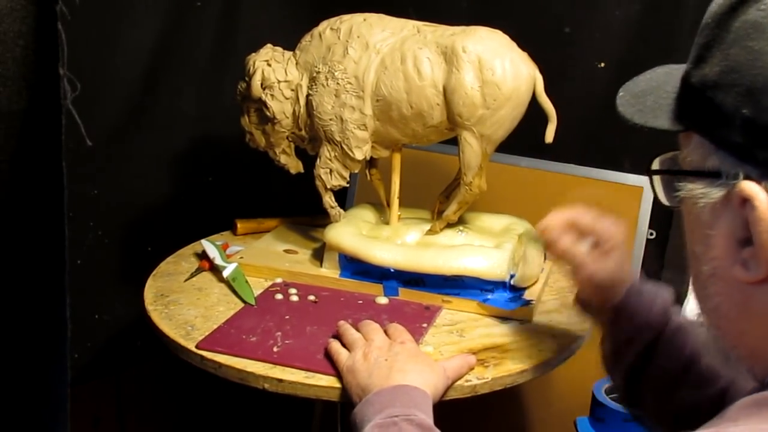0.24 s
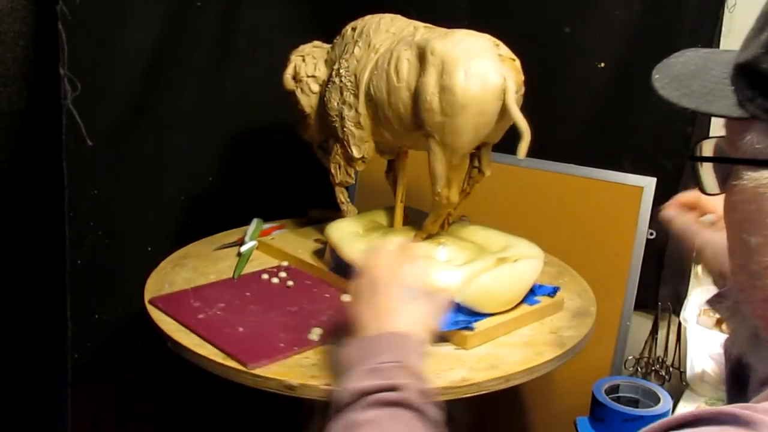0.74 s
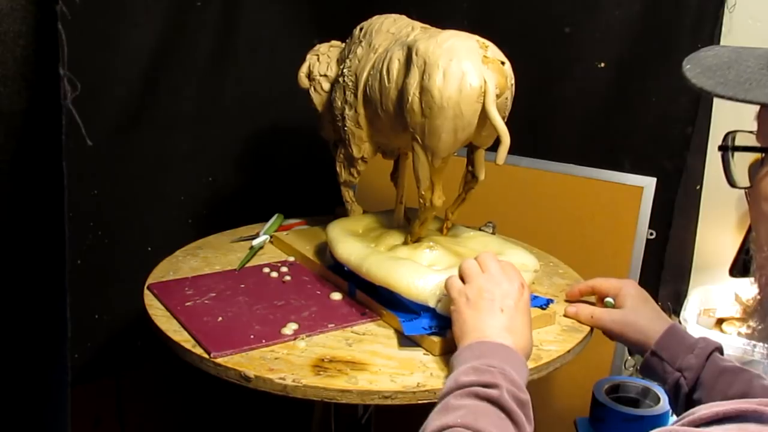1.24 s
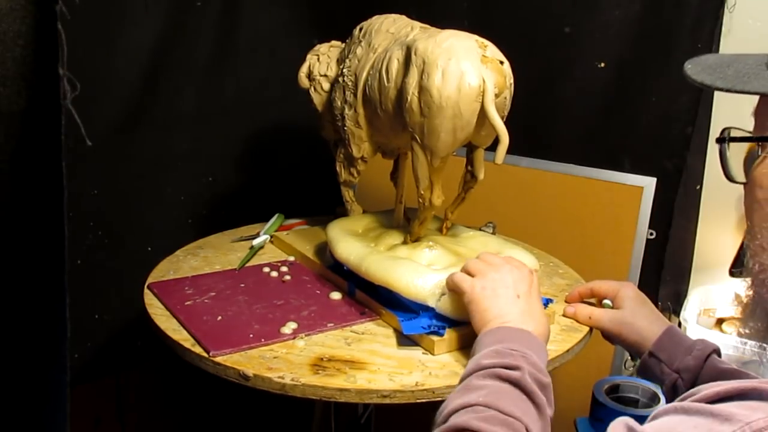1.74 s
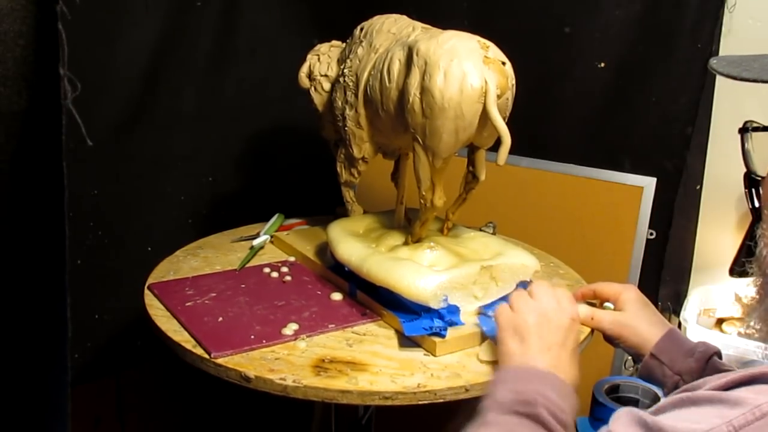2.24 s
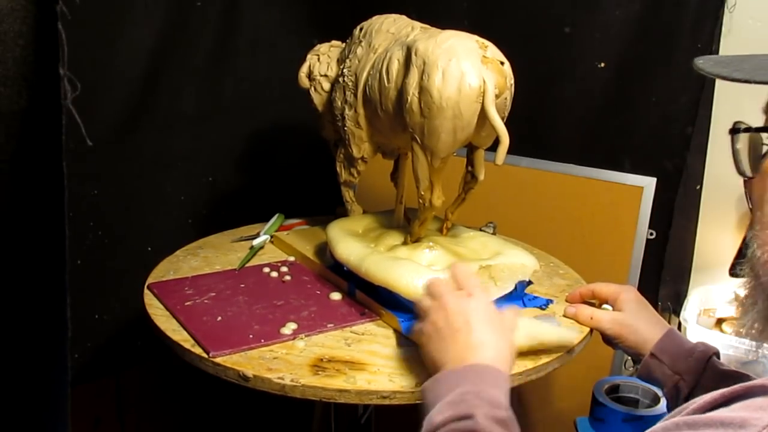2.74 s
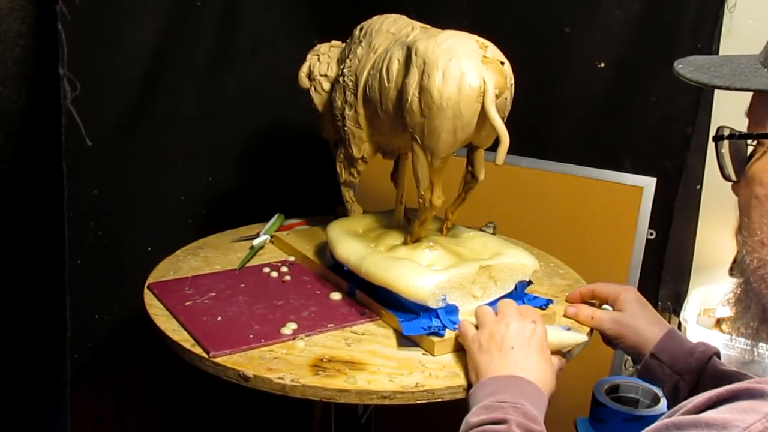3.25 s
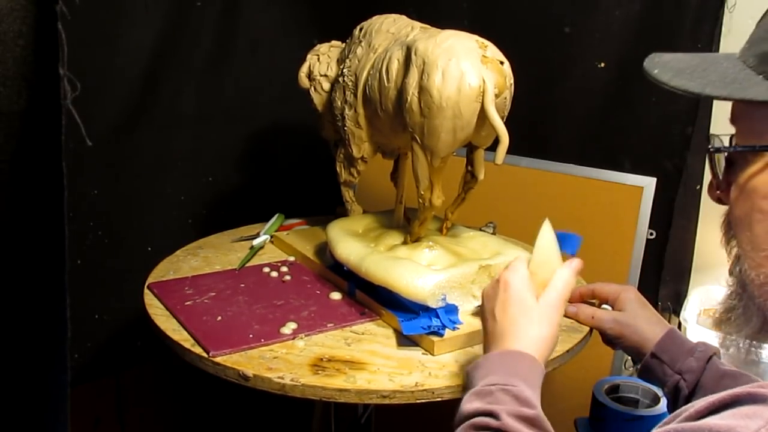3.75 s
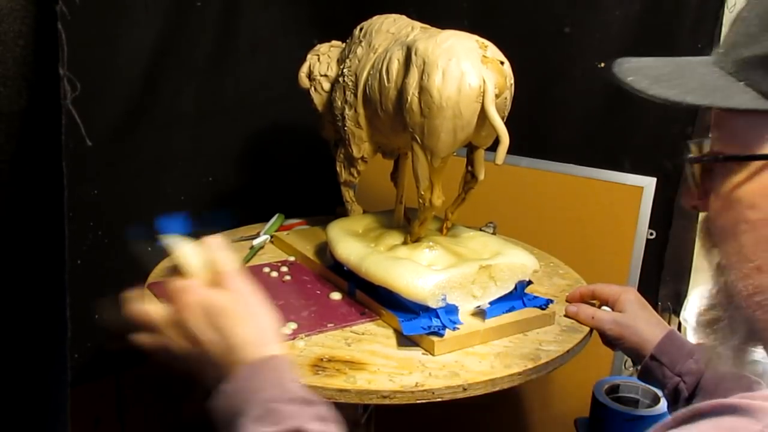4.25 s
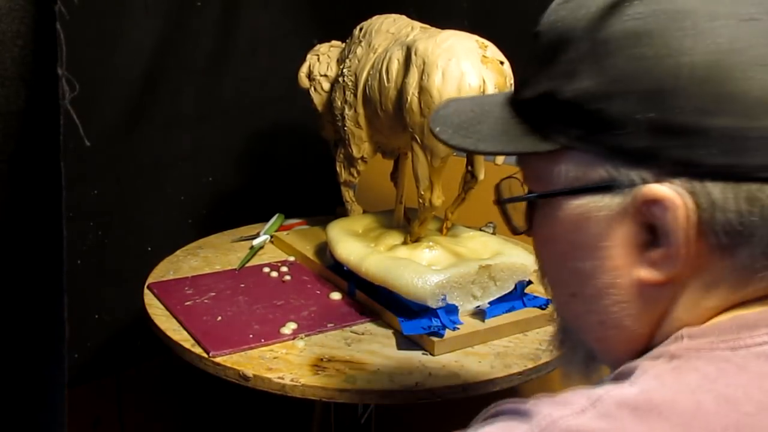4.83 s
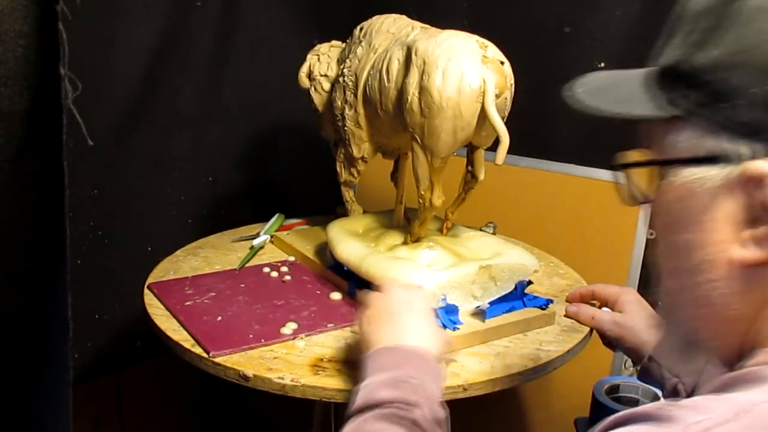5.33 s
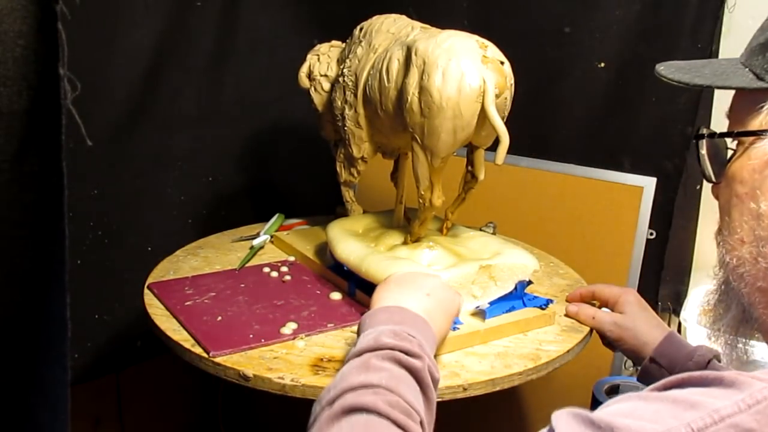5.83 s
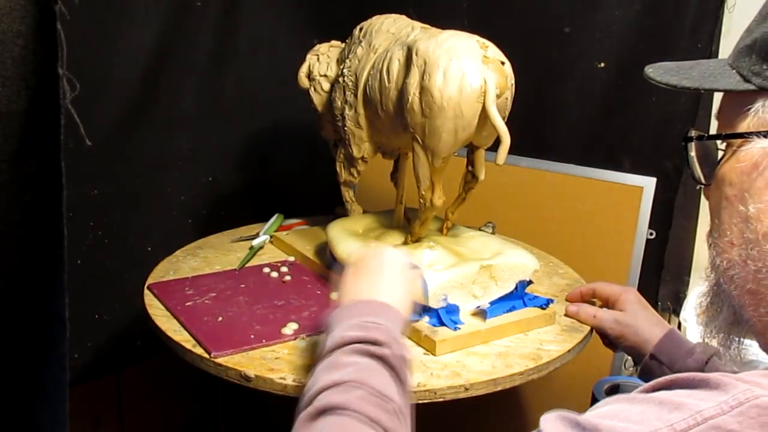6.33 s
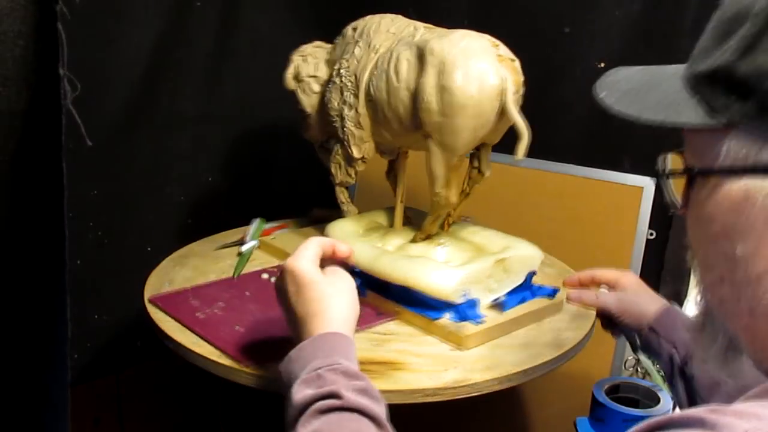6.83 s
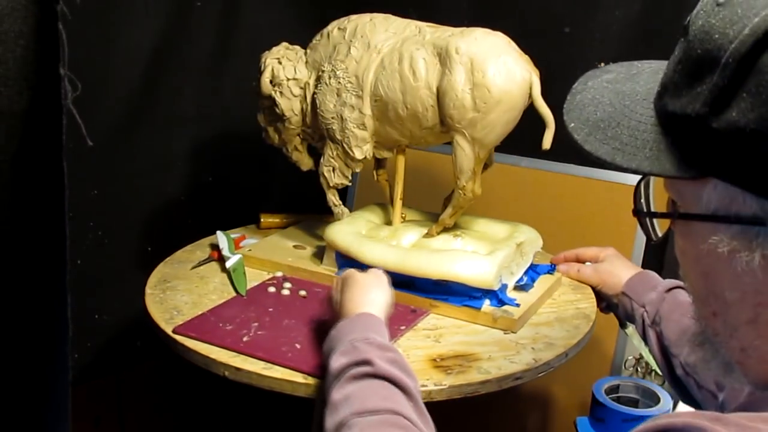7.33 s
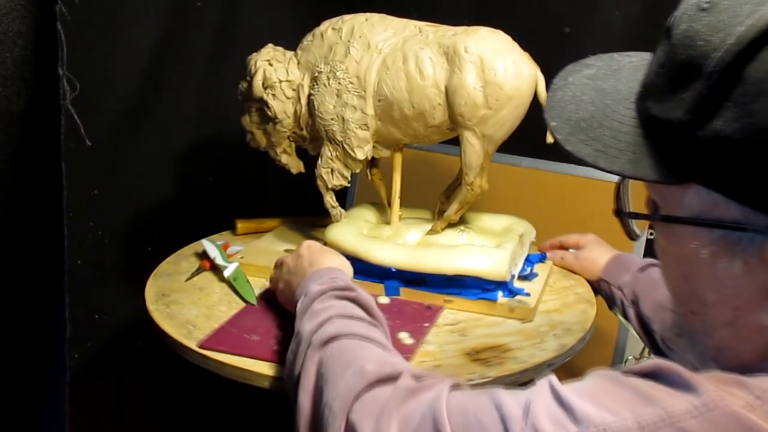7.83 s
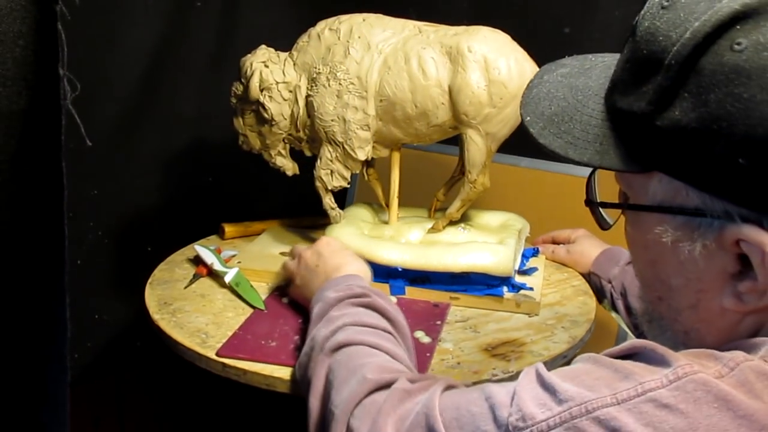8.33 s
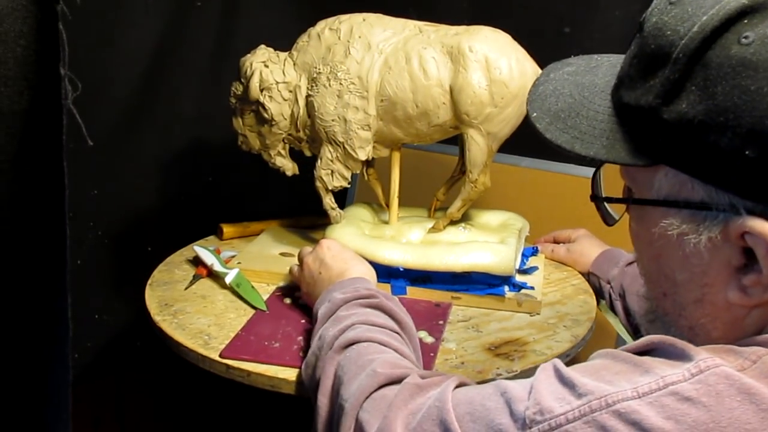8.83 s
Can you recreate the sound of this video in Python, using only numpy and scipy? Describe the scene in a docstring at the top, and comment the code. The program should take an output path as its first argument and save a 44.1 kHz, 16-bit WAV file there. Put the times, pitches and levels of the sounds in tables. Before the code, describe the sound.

Hands pry and tear hard foam and tape off a wooden base in a small quiet studio, with scratchy crackles, sharp snaps and knocks.

```python
"""Hands pry, tear and snap hard foam and tape off a wooden base on a turntable, in a small quiet studio.
A scratchy run of bursting cells (filtered random pulses) opens; snaps (decaying noise) and faint squeaks follow.
Near 2.2 s comes the loudest tear, with knocks (noise-driven resonances), then a ringing break at 3.6 s;
near 5 s a hollow note (a swelling sine) sounds, near 6.3 s a volley of loud snaps, then smaller breaks to the end.
Blurred near echoes and a noise tail answer; filtered noise hisses throughout; the loudest breaks overload."""
import sys
import numpy as np
from scipy import signal
from scipy.fft import rfft, irfft, next_fast_len
from scipy.io import wavfile
from scipy.ndimage import map_coordinates

SR = 44100
rng = np.random.default_rng(int(sys.argv[2]) if len(sys.argv) > 2 else 0)


def put_to_file(sound):
    """Save the sound as 16-bit audio at rate SR, in the file named by the first command-line argument."""
    columns = np.atleast_2d(sound).T  # one column per channel
    safe = np.clip(columns, -1, 1)
    whole_steps = np.round(safe * 32767)
    wavfile.write(sys.argv[1], SR, whole_steps.astype(np.int16))


N = 401310

# Tearing runs. Each row: start in seconds, pull length in seconds, crackle level at the start in dB,
# crackle level at the end in dB, crunch over crackle in dB, base over crackle in dB; all before the mix.
TEARS = [(0, .03, -45.5, -53, 0, -5), (.054, .04, -52.5, -46.5, -5.5, -11),
         (0.099, .06, -33.5, -29.5, -7, -21), (0.168, 0.081, -34, -23, -2, -17.5),
         (.975, 0.041, -60, -59, -1, -10), (1.1, .015, -48, -44.5, -0.5, -11),
         (1.167, .04, -52.5, -55, -6, -20), (1.218, .022, -39.5, -48.5, 0, -17),
         (1.243, .075, -38.5, -51.5, -16, -25), (1.32, .12, -51.5, -50.5, -12.5, -34),
         (1.45, .05, -41, -46.5, -21, -42), (1.523, .022, -38.5, -42.5, -26, -43),
         (1.682, .15, -31.5, -49, -6, -21), (1.865, .05, -55.5, -59, -9, -20),
         (1.911, .14, -48.5, -28.5, -15.5, -29.5), (2.073, .09, -41.5, -55.5, -8, -12.5),
         (2.173, 0.013, -29, -22, -14, -26), (2.188, .009, -23.5, -13, -8, -20),
         (2.197, .045, -2, -10.5, -4, -29), (2.262, 0.19, -30, -58.5, 5, 2),
         (2.472, .065, -43.5, -57.5, -5, -19), (2.55, .055, -34, -33.5, -12, -15.5),
         (2.66, .08, -59.5, -62.5, -7.5, -16), (2.772, .16, -44.5, -65.5, -2, -2),
         (2.99, 0.12, -42.5, -58, -2, -8), (2.95, 0.038, -59, -51, -8, -7.5),
         (3.118, 0.024, -38.5, -45.5, -3.5, -10), (3.15, 0.13, -55, -58, -3.5, -1.5),
         (3.244, 0.094, -44.5, -45, -3, -11), (3.35, .05, -53.5, -53.5, 0.5, -16.5),
         (3.41, .07, -57.5, -52.5, -5.5, -21), (3.499, .105, -37.5, -42, -2.5, -28.5),
         (3.61, .015, -39, -35.5, -1, -33), (3.634, .04, -25.5, -44, 3, -16.5),
         (4.03, .025, -49, -45, -10, -29), (4.113, .02, -44.5, -46.5, -12, -36),
         (4.141, .025, -29, -47.5, -5.5, -28), (4.208, .05, -41, -60.5, -2, -12.5),
         (4.4, .065, -65, -52, -8, -25), (4.597, .03, -51, -55, -1.5, -20),
         (4.667, 0.015, -54, -51, -16, -31), (4.747, 0.015, -39, -50.5, -9.5, -27),
         (4.924, 0.064, -31, -26, 1.5, -2), (4.985, 0.046, -28.5, -40, -3.5, -3),
         (5.046, .012, -26, -36, -2.5, 3), (5.183, 0.045, -49, -67.5, -3.5, -7.5),
         (5.464, .035, -43, -60, -14, -18.5), (5.5, 0.051, -56.5, -54.5, -3, -5.5),
         (5.638, 0.082, -57, -62.5, 0, 0), (5.83, .012, -45, -54.5, -5.5, -22),
         (6.01, .065, -56, -57, 1, -8.5), (6.098, 0.049, -38, -45.5, 1, -28),
         (6.168, 0.051, -28.5, -38.5, 1, -35), (6.223, .035, -23.5, -24, -4.5, -20.5),
         (6.267, 0.014, -18.5, -21, -0.5, -30.5), (6.299, .02, -10.5, -22.5, -2.5, -22),
         (6.326, 0.072, -17.5, -46, 2, -16.5), (6.5, .1, -59.5, -64.5, 3, -14.5),
         (6.84, 0.088, -57.5, -56.5, -1.5, -4), (6.926, .018, -27, -36, -3.5, -27),
         (6.962, .18, -52.5, -56.5, 0, -17), (7.153, .11, -34, -60.5, -2.5, -34),
         (7.27, 0.11, -59, -57.5, -2.5, -13.5), (7.57, .03, -56, -61, -1.5, -16),
         (7.973, 0.039, -58, -58.5, -5, -13), (8.112, .08, -63.5, -64, -6, -10),
         (8.215, 0.014, -57, -50.5, -4.5, -5), (8.288, .07, -35, -49, -4, -19),
         (8.369, .026, -35, -40, -7.5, -24), (8.484, .06, -51, -47.5, -3.5, -17),
         (8.672, 0.048, -46.5, -60.5, -2, -16.5), (8.744, 0.028, -45, -57.5, 0.5, -14),
         (8.843, .03, -38.5, -66, 0, -26), (8.99, .05, -23, -54, -5, -37), (9.045, .055, -52, -54, -5, -13)]
# Fading once a pull ends, in order: crackle, crunch, base and fizz, each in dB per second.
LET_GO = (480, 332, 380, 520)
# Spectrum of small cells bursting. Each row: frequency in Hz, relative density in dB per Hz.
CRACKLE = [(880, -42), (1500, -11), (2240, -4), (3310, -28.5), (4710, -1.5), (6010, -0.5), (9420, 3),
           (12100, 4.5), (15500, -11)]
# Spectrum of the slab flexing. Each row: frequency in Hz, relative density in dB per Hz.
CRUNCH = [(150, -47.5), (400, -22.5), (900, -7.5), (1900, -4.5), (2800, 3.5), (4000, 1.5), (5500, -1),
          (9000, -33.5)]
# Modes of the wooden base. Each row: frequency in Hz, width in Hz, relative level in dB.
BOARD = [(185, 14, -18.5), (435, 56, -7), (607, 240, 0), (858, 50, -2), (1070, 60, 1.5), (1350, 73, 5.5),
         (1970, 330, 2.5)]
# Single breaks. Each row: start in seconds, tick peak in dB before panning, centre in Hz, nominal length in ms.
SNAPS = [(0.053, -29, 7590, 2.8), (.085, -33, 8600, 1.9), (0.1014, -26, 9100, 2.7),
         (.111, -14.5, 9500, 1.5), (0.1246, -13.5, 8340, 5.8), (0.1394, -12.5, 7800, 2.4),
         (.152, -12.5, 8820, 2.7), (0.2043, -14.5, 8516, 4.3), (0.2189, -8, 7960, 3.9),
         (0.2312, -9.5, 8740, 2.4), (0.2516, -9, 8250, 6.8), (0.3923, -38, 6450, 1.7),
         (.471, -23, 7000, 1.14), (0.7773, -33.5, 8700, 0.44), (1.11, -29, 7300, 5.1),
         (1.133, -35.5, 7900, 1.6), (1.168, -28.5, 8800, 1.8), (1.2216, -29, 7160, 4.9),
         (1.243, -15.5, 9400, 1), (1.266, -24.5, 10290, 2), (1.2824, -29.5, 8170, 2),
         (1.299, -33, 9220, 1.7), (1.3132, -32.5, 10170, 1.8), (1.3486, -28, 8800, 1.6),
         (1.38, -32, 9290, 1), (1.4188, -32, 9500, 1.6), (1.448, -27, 9190, 2.1),
         (1.4532, -22.5, 8800, 1.2), (1.4766, -22, 7800, 1.2), (1.5235, -0.5, 12500, .8),
         (1.649, -37.5, 8230, 1.1), (1.665, -33.5, 8780, 3.4), (1.6821, -23.5, 7340, 2.8),
         (1.829, -33, 7810, 1.2), (1.9085, -22.5, 8200, 2), (1.9292, -23, 8160, 1.9),
         (1.9481, -24.5, 10880, 1.1), (1.9643, -21, 9506, 2.8), (1.99, -21, 9100, 2),
         (2.01, -13.5, 8000, 1.5), (2.0287, -6.5, 9400, 0.34), (2.0481, -17, 9170, 2.9),
         (2.0527, -3.5, 11000, 1.3), (2.118, -26.5, 10200, 0.55), (2.158, -27, 8300, .8),
         (2.1737, -18, 9400, 1.7), (2.176, -11, 7600, 1.2), (2.1913, -6.5, 7140, 3), (2.1965, 2, 7620, 2.7),
         (2.37, -28, 6030, 3.6), (2.4781, -25, 9534, 2.2), (2.54, -34, 8390, 1.7), (2.5499, -26, 8400, 6.8),
         (2.5529, -21.5, 9100, 3.5), (2.7065, -39, 7493, 1.3), (2.7498, -41.5, 5350, 2.6),
         (2.77, -30.5, 7104, 1.8), (2.792, -33, 7440, 2.8), (2.8245, -31.5, 7950, 3.8),
         (2.8952, -35.5, 7430, 3), (2.9922, -32.5, 7804, 5.5), (3.0263, -30, 7195, 2.1),
         (3.055, -34, 8790, 2), (3.14, -33, 6400, 1.9), (3.2071, -41.5, 5935, 3), (3.3392, -26, 8400, 2.6),
         (3.5, -15.5, 5900, 3.8), (3.5201, -26, 6500, 2.7), (3.5365, -26, 6296, 2.2),
         (3.5607, -20, 6030, 1.4), (3.634, -2.5, 4000, 4.4), (3.9, -35.5, 7910, 2.2),
         (3.975, -43, 10000, 1.5), (3.999, -46, 8404, 1.4), (4.0357, -32.5, 7600, .7),
         (4.0427, -27.5, 5610, 1.5), (4.118, -31, 8500, 3.5), (4.141, -19.5, 5560, 3.1),
         (4.2099, -25.5, 7900, 2.1), (4.3876, -41.5, 10000, 1.5), (4.4413, -40, 7195, 2.3),
         (4.5684, -40.5, 9444, 1.5), (4.5988, -36, 7230, 2.2), (4.6715, -38.5, 9500, 3.4),
         (4.6808, -32.5, 12330, 3.9), (4.75, -36, 7800, 4.3), (4.924, -29, 4800, 4.5),
         (4.9267, -17.5, 5007, 3.4), (5.0512, -22.5, 5360, 5.5), (5.4627, -37.5, 5400, 1.9),
         (5.6412, -41, 5100, 1.3), (5.7653, -33, 10110, .5), (5.832, -26, 11100, 1),
         (6.014, -36, 7820, 2.7), (6.062, -39, 5200, 2.7), (6.098, -23.5, 6744, 1.7),
         (6.137, -20.5, 10000, 1.7), (6.169, -12, 8300, 1.4), (6.1827, -12.5, 6630, 4.8),
         (6.1922, -13, 5230, 0.79), (6.22, -19.5, 8420, 2.3), (6.2267, -12.5, 8050, 2),
         (6.2331, -7.5, 8040, 1.6), (6.2405, -8.5, 7585, 2.2), (6.2688, -9, 6400, 4.5),
         (6.2756, -6.5, 6200, 3.7), (6.2995, 3, 7250, 1.4), (6.3265, 1.5, 4983, 2.6),
         (6.8055, -41, 9035, 1.3), (6.853, -39, 5000, 2.5), (6.9257, -8, 4800, 0.48),
         (6.9336, -13, 6440, 1.2), (7.088, -36, 7304, 4.4), (7.1523, -18, 6700, 1.1),
         (7.1735, -12, 9370, 0.82), (7.2192, -29.5, 5197, 1.4), (7.3275, -34.5, 7980, 3.3),
         (7.384, -29.5, 4370, 1.3), (8.0071, -35, 9370, 2.4), (8.121, -34.5, 9600, 2.6),
         (8.273, -42, 7270, 3), (8.2916, -31, 7305, 4.4), (8.2967, -20, 8300, 1.9),
         (8.3494, -25.5, 10100, .9), (8.3714, -20.5, 9290, 2.3), (8.3747, -16.5, 8286, 0.92),
         (8.397, -20.5, 5910, 2.6), (8.673, -35, 6794, 2.7), (8.762, -37.5, 4110, 4.2),
         (8.8432, -25, 8424, 3.5), (8.991, -14, 9020, 2.6), (8.997, -10, 9000, 2.8),
         (9.0839, -29, 8600, 1.4)]
# Loose pieces knocking. Each row: start in seconds, peak in dB before panning, ring in Hz,
# 60 dB decay of the contact in seconds.
KNOCKS = [(1.682, -36, 2200, .034), (2.064, -24.5, 1940, 0.044), (2.064, -42.5, 174, 0.094),
          (2.176, -29, 5336, 0.042), (2.19, -35, 243, 0.056), (2.258, -1.5, 1816, .035),
          (2.265, -6, 1967, 0.023), (2.774, -32, 850, .036), (2.774, -34, 640, 0.11),
          (2.779, -46.5, 185, .19), (3.6339, -12.5, 3950, 0.094), (3.634, -15.5, 1904, 0.074),
          (4.042, -40.5, 2345, .037), (4.143, -30.5, 2620, 0.056), (4.208, -50, 623, .022),
          (4.926, -33, 890, 0.1), (4.94, -39, 250, 0.16), (4.995, -22, 1350, 0.046),
          (5.046, -23.5, 1130, .07), (5.048, -25, 1700, .07), (5.466, -38.5, 3070, 0.044),
          (6.167, -23, 2000, .05), (6.326, -42, 329, .025), (6.327, -10, 4136, .05), (6.927, -22, 3660, .1),
          (7.153, -34, 2870, 0.059), (7.381, -40, 1600, 0.021)]
# Foam rubbing on foam. Each row: start in seconds, peak in dB before panning, pitch in Hz,
# 60 dB decay of the contact in seconds.
SQUEAKS = [(1.57, -57.5, 1920, .11), (1.62, -51, 1880, .11), (1.91, -48.5, 1870, .26),
           (8.504, -48, 7950, .08)]
# A hollow container as a piece drops in. In order: start in seconds, end in seconds, pitch in Hz,
# level in dB before panning and its shares in the mix.
HOLLOW_NOTE = (4.945, 5.008, 428, -24)
# Near surfaces. Each row: delay in seconds, level in dB before panning, left-right difference in dB.
WALLS = [(.0043, -5.5, 3.5), (.0068, -12.5, -11), (0.0121, -14, 1), (.016, -30.5, -2), (.0228, -25, 8.5),
         (.031, -26.5, -4.5)]
# Decay of the room. Each row: frequency in Hz, 60 dB decay time in seconds.
ROOM_DECAY = [(200, 0.46), (1000, 0.38), (3000, 0.33), (6000, 0.22), (12000, 0.2)]
# Close ports hear long waves alike. Each row: frequency in Hz, shared over separate sound in dB.
SHARED = [(300, 10), (1500, 0.5), (10000, 0)]
# Spectrum of the hiss. Each row: frequency in Hz, relative density in dB per Hz.
HISS = [(15, -35.5), (25, -8.5), (101, -1), (152, -2), (322, -4), (359, -2.5), (509, -6), (631, -5.5),
        (1580, -7), (1900, -9.5), (4380, -12), (10600, -11.5), (15500, -19)]
# Likeness of the hiss at the two ports. Each row: frequency in Hz, left-right correlation (no unit).
ALIKE = [(30, .6), (300, 0.31), (2000, 0.6), (12000, 0.27)]

GRIP_S = .0015  # time constant with which a pull takes hold
FIZZ_HZ = 9500  # crossover above which crackle is fizz
USUAL_CRUNCH_DB, DULLS = -10, 0.25  # fizz drops by DULLS dB for each dB of crunch above the usual
SNAP_PAN_DB = .5  # left-right difference
BODY_DB, BODY_HZ, BODY_MS = -8, 6020, 2.1  # push relative to the tick, for a break of this centre and length
THINS_DB, SWELLS_DB = 22, 5  # push lost per octave brighter, gained per doubling of length
BODY_TOP_DB = -1  # ceiling of the push relative to the tick
KNOCK_WIDTH, KNOCK_DAMP_HZ = 0.24, 260  # width of a ring: share of its pitch plus a constant loss
CONTACT_S, CONTACT_CYCLES = 0.00091, 0.43  # rise of a knock: a short contact plus part of a cycle
SQUEAK_WIDTH_HZ, SQUEAK_RISE_S = 320, .012
SCATTER_S = .0015  # decay constant with which a cluttered surface spreads its echo
HISS_DB = -61.5  # rms of the middle signal at the microphone input
TOP_HZ = 15665  # band limit


def tearing():
    """Fracture under load: fine crackle, deeper slab crunch and the shaken base all follow the hand's pull."""
    t = np.arange(SR) / SR
    power = np.zeros((4, N + SR))  # crackle, crunch, base, fizz
    for start_s, length_s, first_db, last_db, crunch_db, base_db in TEARS:
        pull_db = first_db + (last_db - first_db) * np.clip(t / length_s, 0, 1)
        fizz_db = DULLS * (USUAL_CRUNCH_DB - crunch_db)
        over_db = np.array([[0], [crunch_db], [base_db], [fizz_db]])
        fade_db = np.outer(LET_GO, np.clip(t - length_s, 0, 1))
        level = amp(pull_db - fade_db + over_db) * (1 - np.exp(-t / GRIP_S))
        start = round(start_s * SR)
        power[:, start:start + SR] += level ** 2  # overlapping pulls add in power
    crackle_gain, crunch_gain, base_gain, fizz_gain = np.sqrt(power[:, :N])
    fine = cells(2500, spread_db=2.5, clump_db=4.0, smooth=0.32, spectrum=CRACKLE)
    fizz = filtered(fine, lambda hz: 1 / (1 + (FIZZ_HZ / (hz + 1)) ** 6))
    crackle = crackle_gain * (fine - fizz) + fizz_gain * fizz
    crunch = crunch_gain * cells(1200, spread_db=4.5, clump_db=4.0, smooth=0.93, spectrum=CRUNCH)
    shaken = filtered(rng.standard_normal(N), lambda hz: board(hz) * mode(hz, 460, 1400))
    base = base_gain * unit(shaken)
    return sides(0.6) * (amp(-1.5) * crackle + amp(-4.5) * crunch + amp(-7.5) * base)


def cells(rate, spread_db, clump_db, smooth, spectrum):
    """Shot noise: cells burst at random moments and sizes, in clumps, over a rub that differs left and right."""
    happens = rng.random(N) < rate / SR  # rate in bursts per second
    bursts = happens * amp(spread_db * rng.standard_normal(N)) * rng.choice([-1, 1], N)
    clumps = map_coordinates(rng.standard_normal(N // 200 + 4), [np.arange(N) / 200])
    rub = smooth * rng.standard_normal((2, N))
    pair = amp(clump_db * clumps) * (unit(bursts) + rub)
    return unit(filtered(pair, lambda hz: amp(along(spectrum, hz))))


def snaps():
    """Brittle fracture: brief splintering gives a bright tick and a push into the slab; thin cells push less."""
    out = np.zeros((2, N + SR))
    t = np.arange(SR // 20) / SR
    for start_s, peak_db, centre_hz, length_ms in SNAPS:
        thinning_db = THINS_DB * np.log2(centre_hz / BODY_HZ)
        swelling_db = SWELLS_DB * np.log2(length_ms / BODY_MS)
        body_db = min(BODY_DB - thinning_db + swelling_db, BODY_TOP_DB)
        decay_s = np.clip(.0004 * length_ms, 1e-4, .01)  # 0.4 of the nominal length
        noise = rng.standard_normal((3, len(t))) * np.exp(-t / decay_s)
        splinters = noise[0] + 1.1 * noise[1:]  # left and right share one part
        tick = filtered(splinters, lambda hz: mode(hz, centre_hz, centre_hz) ** 2)
        push = filtered(noise[1], lambda hz: mode(hz, 2900, 3300) ** 2)
        both = tick / abs(tick.mean(0)).max() + amp(body_db) * push / abs(push).max()
        start = round(start_s * SR)
        out[:, start:start + len(t)] += amp(peak_db) * sides(SNAP_PAN_DB) * both
    return out[:, :N]


def knocks():
    """Impact excitation: a loose piece rings, and the quicker its contact, the harder it jolts the base."""
    ring, blows = np.zeros(N + SR), np.zeros(N)
    for start_s, peak_db, ring_hz, t60 in KNOCKS:
        start = round(start_s * SR)
        rise_s = CONTACT_S + CONTACT_CYCLES / ring_hz
        width_hz = KNOCK_WIDTH * ring_hz + KNOCK_DAMP_HZ
        ring[start:start + SR // 3] += rubbed(peak_db, ring_hz, width_hz, t60, rise_s)
        blows[start] = amp(peak_db + 8.0) * 0.0024 / rise_s
    jolts = filtered(blows, lambda hz: board(hz) * mode(hz, 1000, 1500))
    return sides(.8) * (ring[:N] + jolts)


def squeaks():
    """Friction: foam rubbing on foam slowly feeds one resonance, faintly heard."""
    out = np.zeros(N + SR)
    for start_s, peak_db, ring_hz, t60 in SQUEAKS:
        start = round(start_s * SR)
        out[start:start + SR // 3] += rubbed(peak_db, ring_hz, SQUEAK_WIDTH_HZ, t60, SQUEAK_RISE_S)
    return sides(.8) * out[:N]


def rubbed(peak_db, ring_hz, width_hz, t60, rise_s):
    """Forced resonance: rough contact, swelling and dying, excites one broad mode."""
    t = np.arange(SR // 3) / SR
    swell = (1 - np.exp(-t / rise_s)) ** 2
    contact = amp(-60 * t / t60) * swell * rng.standard_normal(len(t))
    body = filtered(contact, lambda hz: mode(hz, ring_hz, width_hz) ** 2)
    return amp(peak_db) * body / abs(body).max()


def board(hz):
    """Modal superposition: the resonances of the wooden base add with alternating sign."""
    return sum((-1) ** k * amp(db) * mode(hz, centre_hz, width_hz)
               for k, (centre_hz, width_hz, db) in enumerate(BOARD))


def hollow_note():
    """Cavity resonance: a hollow container gives a brief swell of one low, nearly clean tone."""
    start_s, end_s, ring_hz, db = HOLLOW_NOTE
    t = np.arange(N) / SR
    swell = np.sin(np.pi * np.clip((t - start_s) / (end_s - start_s), 0, 1)) ** 1.5
    return sides(0.68) * amp(db) * swell * np.sin(2 * np.pi * ring_hz * t)


def studio(x):
    """Reflection and reverberation: near surfaces answer, then a tail with its own decay at each frequency."""
    early = np.zeros((2, N))
    for delay_s, db, pan_db in WALLS:
        delayed = np.pad(x, ((0, 0), (round(delay_s * SR), 0)))[:, :N]
        early += amp(db) * sides(pan_db) * delayed
    answer, step = np.zeros((2, N + 2 * SR)), SR // 20
    early = np.pad(early, ((0, 0), (0, 2 * step)))
    mono = np.pad(x.mean(0), (0, 2 * step))
    fade = np.hanning(2 * step) ** .5  # overlapping blocks keep the power even
    # each block draws a fresh scatter and tail, so no fixed colouring builds up
    for start in range(0, N, step):
        block = slice(start, start + 2 * step)
        near = signal.fftconvolve(early[:, block] * fade, scatter(), axes=1)
        tail = room_tail()
        wet = signal.fftconvolve((mono[block] * fade)[None], tail, axes=1)
        answer[:, start:start + near.shape[1]] += near
        late = start + 200  # samples
        answer[:, late:late + wet.shape[1]] += amp(-8.5) * wet
    return x + answer[:, :N]


def scatter():
    """Diffuse reflection: a cluttered surface spreads an echo; the two ports differ mostly in the treble."""
    t = np.arange(SR // 100) / SR
    noise = rng.standard_normal((3, len(t)))
    difference = np.gradient(noise[:2], axis=1)  # weak in the bass
    blur = (noise[2] + difference) * np.exp(-t / SCATTER_S)
    return blur / np.linalg.norm(blur, axis=1, keepdims=True)


def room_tail():
    """Diffuse field: noise dies exponentially, each frequency at its own speed, the bass alike at both ports."""
    hz, t, z = signal.stft(rng.standard_normal((3, SR // 2)), SR, nperseg=256)
    shared = amp(along(SHARED, hz))[:, None] * z[2]
    decay = amp(-60 * t / along(ROOM_DECAY, hz)[:, None])
    tail = signal.istft((z[:2] + shared) * decay, SR, nperseg=256)[1]
    return tail / np.linalg.norm(tail[0])


def hiss():
    """Partly coherent noise: quiet room air and microphone noise, with middle and side set by the likeness."""
    def shape(hz):
        turn = np.arccos(np.clip(along(ALIKE, hz), -1, 1)) / 2
        return amp(along(HISS, hz)) * [np.cos(turn), np.sin(turn)]

    mid, side = filtered(rng.standard_normal((2, N)), shape)
    return amp(HISS_DB) / np.std(mid) * np.array([mid + side, mid - side])


def amp(db):
    """Decibel law: the amplitude gain of a level in dB."""
    return 10 ** (np.asarray(db) / 20)


def unit(x):
    """Normalisation: the signal scaled to rms 1."""
    return x / np.sqrt(np.mean(x ** 2) + 1e-20)


def along(points, hz):
    """Interpolation of (Hz, value) points on a logarithmic frequency axis."""
    f, v = np.transpose(points)
    return np.interp(np.log(hz + 1), np.log(f + 1), v)


def filtered(x, response):
    """Linear filtering: the spectrum times a complex response of frequency."""
    m = next_fast_len(x.shape[-1] + 8192)  # room for the ringing
    spectrum = rfft(x, m) * response(np.fft.rfftfreq(m, 1 / SR))
    return irfft(spectrum, m)[..., :x.shape[-1]]


def mode(hz, centre_hz, width_hz):
    """Damped oscillator: one causal resonance with gain 1 at its centre."""
    return 1j * hz * width_hz / (centre_hz ** 2 - hz ** 2 + 1j * hz * width_hz)


def sides(db):
    """Level difference: left and right gains that differ by this many dB."""
    return amp([[db / 2], [-db / 2]])


def scene():
    """Superposition: the handling sounds in the studio, over hiss; the hollow note hardly reaches the walls."""
    hollow = hollow_note()
    handling = tearing() + snaps() + knocks() + squeaks()
    return studio(handling + 0.17 * hollow) + 0.76 * hollow + hiss()


def record(dry):
    """Saturation: the microphone fades at the top, overloads near full scale and has a steep band limit."""
    heard = filtered(dry, lambda hz: 1 / (1 + (hz / 15000) ** 8))
    overloaded = heard / (1 + abs(heard) ** 8) ** (1 / 8)
    limited = filtered(overloaded, lambda hz: np.where(hz < TOP_HZ, 1, .02))
    return np.clip(limited, -1, 1)


dry = scene()
out = record(dry)
put_to_file(out)
```